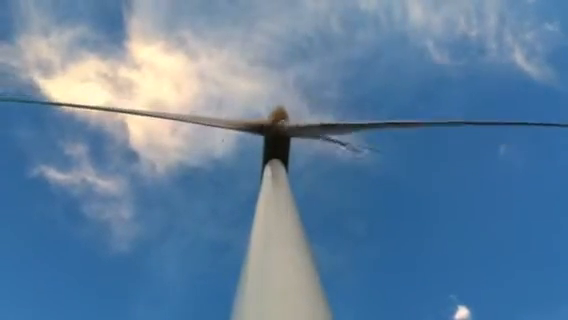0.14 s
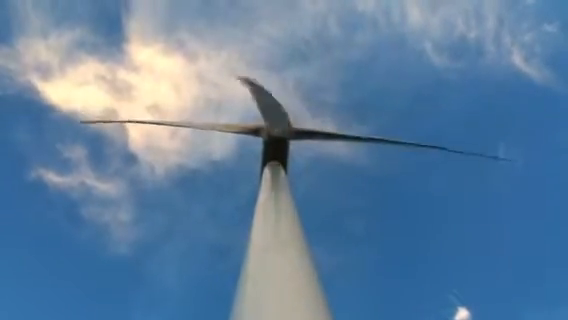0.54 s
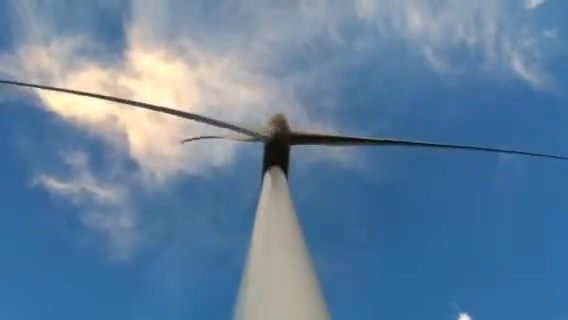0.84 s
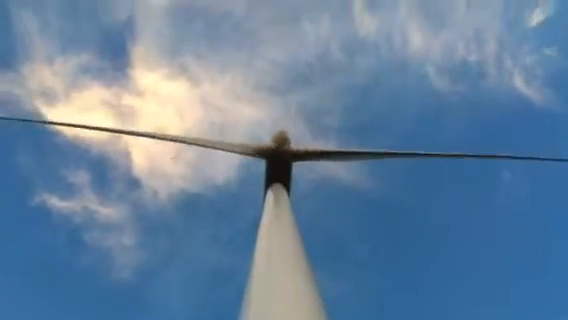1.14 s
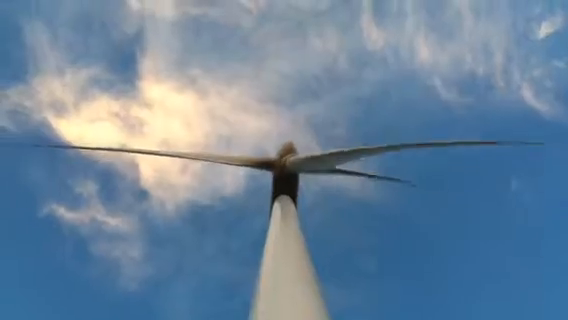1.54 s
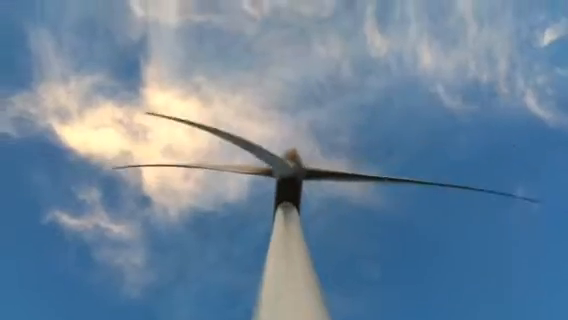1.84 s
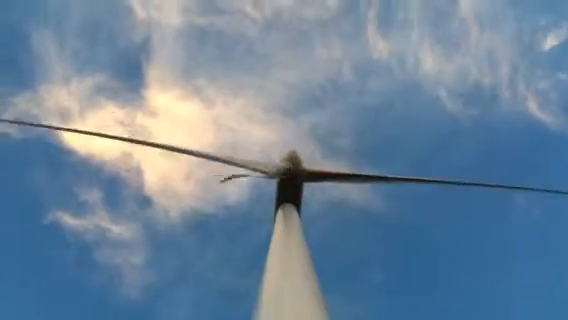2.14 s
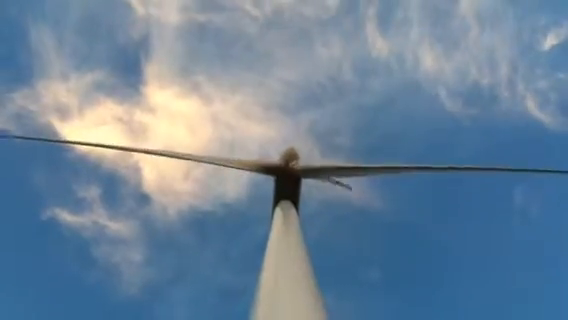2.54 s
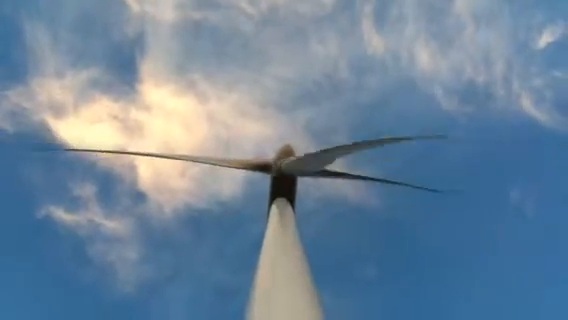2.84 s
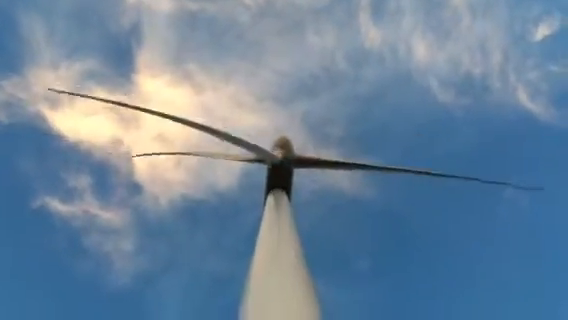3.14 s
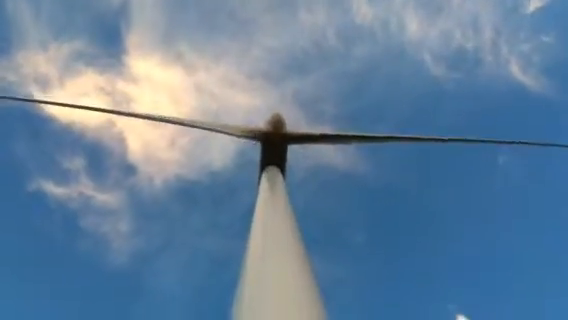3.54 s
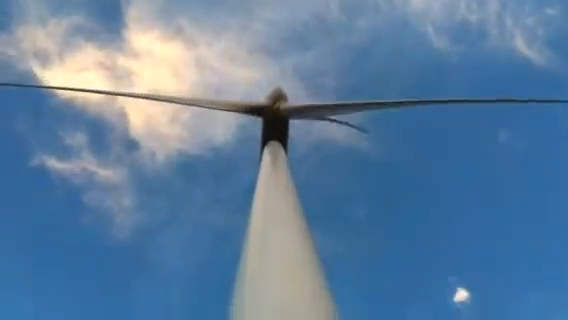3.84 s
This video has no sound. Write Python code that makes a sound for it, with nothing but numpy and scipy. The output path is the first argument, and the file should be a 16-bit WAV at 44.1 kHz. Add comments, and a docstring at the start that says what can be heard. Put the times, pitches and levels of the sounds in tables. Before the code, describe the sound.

Large turbine blades sweep by in regular breathy whooshes, each ending in fine hiss. Strong wind buffeting, irregular low thuds and snaps on an unprotected microphone grow from mid-clip, above a deep distant rush, outdoors.

```python
"""A wind turbine heard from the foot of its tower: each blade sweeps down with an airy swish that breaks
off as it passes, the finest hiss last, all shaped from random short-time spectra over a distant rush.
Gusty wind buffets the bare microphone: lumpy low noise makes the rumble, windowed noise bursts the short
snaps and thuds of eddies, and steady filtered noise lies deep underneath."""
import sys
import numpy as np
from scipy import signal
from scipy.fft import rfft, irfft, next_fast_len
from scipy.io import wavfile
from scipy.ndimage import uniform_filter1d

SR = 44100
rng = np.random.default_rng(int(sys.argv[2]) if len(sys.argv) > 2 else 0)


def invert_db(level):
    """Linear amplitude ratio for a level in decibels (20 dB per decade), elementwise."""
    return 10 ** (np.asarray(level, dtype=float) / 20)


def transcribe(u):
    """Save the signal u as a 16-bit wav file named by the first command-line argument.

    u: samples, shape (n,) or (channels, n), limited to [-1, 1]; the rate is SR.
    q: integer samples, one column per channel.
    """
    v = np.clip(np.atleast_2d(u).T, -1, 1)
    q = np.round(v * 32767).astype(np.int16)
    wavfile.write(sys.argv[1], SR, q)


N = 176400  # samples, 4 s


def read(points, hz):
    """Reads a spectrum in dB at hz, along a log frequency axis; -120 dB outside its points."""
    f, value = np.transpose(points)
    return np.interp(np.log(hz + 1), np.log(f + 1), value, left=-120, right=-120)


def evened(x):
    """Scales a signal to an rms of 1."""
    return x / np.sqrt(np.mean(x ** 2) + 1e-20)


def unit(points, hz):
    """Power per bin of a spectrum, summing to 1."""
    power = invert_db(2 * read(points, hz))
    return power / power.sum()


def step(t, width):
    """Smooth rise from 0 to 1 around t = 0."""
    return .5 + .5 * np.tanh(t / width)


def coloured(x, points):
    """Filters a signal to a spectrum given in dB."""
    size = next_fast_len(len(x))
    gain = invert_db(read(points, np.fft.rfftfreq(size, 1 / SR)))
    return irfft(rfft(x, size) * gain, size)[:len(x)]


def bell(t, rise_s, fall_s):
    """Bell-shaped power envelope around t = 0, with its own rise and fall."""
    return np.exp(-(t / np.where(t < 0, rise_s, fall_s)) ** 2)


def blades():
    """Turbulent air leaving the blade edges, as random short-time spectra whose power follows each pass."""
    # Blade passes. Each row: time of the pass in seconds, then the levels in dB of swish, hiss,
    # upper swish and body.
    passes = [(-.6, -56, -68, -80, -58), (.61, -52.5, -63, -78, -49.5), (1.84, -54.5, -64, -71.5, -51.5),
              (3.041, -57.5, -63, -63.5, -52.5), (4.26, -52.5, -64.5, -80, -49)]
    # Each blade is faintly heard earlier. Each row: seconds before its pass, swish level in dB.
    faint = [(.9, -64), (.9, -56.5), (0.88, -62.5), (0.82, -67.5), (0.93, -60.5)]
    # Tone of the airy swish. Each row: frequency in Hz, density in dB per Hz.
    swish = [(1060, -37), (1800, -13.5), (2310, -15.5), (3190, -0.5), (3600, -1), (4260, -4.5), (5220, -18),
             (9000, -33), (11700, -61), (19800, -120)]
    # Tone of the fine hiss. Each row: frequency in Hz, density in dB per Hz.
    hiss = [(2650, -36.5), (4500, 0.5), (5750, -10), (8250, -13), (13900, -18.5), (15200, -15)]
    # Tone of the duller body under the swish. Each row: frequency in Hz, density in dB per Hz.
    body = [(500, -13.5), (900, -1), (1500, 0.5), (2000, -4), (2600, -11), (3200, -25.5)]
    # Tone of the steady distant rush. Each row: frequency in Hz, density in dB per Hz.
    air = [(150, -25), (250, -10), (514, -16.5), (643, -19.5), (725, -12.5), (1440, -16.5), (2420, -25),
           (3240, -27.5), (5150, -36.5), (15200, -53.5)]
    air_db = -50.5
    # the swish comes clear, swells, breaks off, its treble later
    clear_s, clear_rise_s, swell_db_per_s = 0.471, .015, 3
    break_s, swish_lag_s_per_khz = .04, .055
    faint_rise_s = 0.045
    lull_db, lull_s = -1, 0.037  # a short lull comes just before the swish clears
    # finer hiss comes later and rises faster
    hiss_rise_s, hiss_fall_s, hiss_narrow_hz = .5, 0.14, 9000
    hiss_lag_s, hiss_lag_s_per_khz = -0.069, .012
    upper_hz, upper_width_hz, upper_swell_db_per_s = 6100, 780, 14.
    body_lead_s, body_rise_s, body_fall_s = 0.033, 0.38, 0.097
    # a dip from a nearby reflection jumps up just before a blade passes and slides back after
    rest_hz, jump_hz, back_s, dip_width_hz, dip_db = 2270, 870, 0.32, 330, -5.5

    hz = np.fft.rfftfreq(512, 1 / SR)[:, None]
    t = np.arange(N // 128 + 5) * 128 / SR
    power = unit(air, hz) * invert_db(2 * air_db) + 0 * t
    dip_hz = rest_hz + 0 * t
    lulls_db = 0 * t
    upper_band = 1 / (1 + ((hz - upper_hz) / upper_width_hz) ** 2) ** 2
    upper_band /= upper_band.sum()
    for (s, swish_db, hiss_db, upper_db, body_db), (early, faint_db) in zip(passes, faint):
        u = t - s
        clear = step(u + clear_s, clear_rise_s)
        before = np.minimum(u, 0)
        near = clear * invert_db(2 * (swish_db + swell_db_per_s * before))
        far = invert_db(2 * faint_db) * step(u + early, faint_rise_s)
        gone = step(swish_lag_s_per_khz * (hz / 1000 - 3.6) - u, break_s)
        power += unit(swish, hz) * (near + far) * gone

        hiss_t = u - hiss_lag_s - hiss_lag_s_per_khz * hz / 1000
        hiss_swell = bell(hiss_t, hiss_rise_s / (1 + hz / hiss_narrow_hz), hiss_fall_s)
        power += unit(hiss, hz) * invert_db(2 * hiss_db) * hiss_swell

        upper_level = invert_db(2 * (upper_db + upper_swell_db_per_s * before))
        power += upper_band * upper_level * clear * step(.04 - u, .02)

        body_swell = bell(u + body_lead_s, body_rise_s, body_fall_s)
        power += unit(body, hz) * invert_db(2 * body_db) * body_swell

        lulls_db += lull_db * np.exp(-((u + clear_s + lull_s) / lull_s) ** 2)
        dip_hz += jump_hz * step(u + 0.085, 0.024) * np.exp(-(np.maximum(u, 0) / back_s) ** 2)
    power *= invert_db(2 * lulls_db)
    power *= invert_db(2 * dip_db * np.exp(-((hz - dip_hz) / dip_width_hz) ** 2))

    real, imag, patches = rng.standard_normal((len(t), len(hz), 3)).T
    # uneven patches, 6 bins by 20 frames wide
    patches = uniform_filter1d(uniform_filter1d(patches, size=6, axis=0), size=20, axis=1)
    spectra = (real + 1j * imag) * np.sqrt(power) * invert_db(.7 * evened(patches))
    return signal.istft(spectra, nperseg=512, noverlap=384)[1][:N] / np.sqrt(3)  # overlap level


def deep_rush():
    """A steady deep rush, from the tower or the wind at large, as filtered noise."""
    # Tone of the rush. Each row: frequency in Hz, relative level in dB.
    deep = [(25, -20.5), (45, -3.5), (76, -5.5), (110, -7.5), (160, -47)]
    deep_db = -44
    return invert_db(deep_db) * evened(coloured(rng.standard_normal(N), deep))


def rumble():
    """Wind pressure on the microphone: low noise in random lumps, riding the gusts."""
    # Gust strength over time. Each row: time in seconds, rumble level in dB.
    gust = [(0.0, -39), (0.32, -50), (0.66, -39), (1.1, -38.5), (1.56, -34), (1.75, -31.5), (2.37, -38.5),
            (2.68, -36), (2.95, -35), (3.07, -39), (3.19, -41.5), (3.31, -30.5), (3.52, -38.5),
            (3.66, -44.5), (3.81, -55), (4.0, -47.5)]
    # Tone of the rumble. Each row: frequency in Hz, density in dB per Hz.
    rumble_tone = [(12, -44.5), (20, -11.5), (59, -2), (97, 2.5), (178, -4.5), (348, -24), (422, -23),
                   (700, -32), (910, -59), (1540, -120)]
    lump_db, lump_s = 4., 0.021
    bright_db_per_db = 0.1252  # gain above 170 Hz, per dB of level over -41.5 dB

    t = np.arange(N) / SR
    size = max(round(lump_s * SR), 2)
    lump = evened(uniform_filter1d(uniform_filter1d(rng.standard_normal(N), size), size))
    level_db = np.interp(t, *np.transpose(gust)) + lump_db * lump
    noise = evened(coloured(rng.standard_normal(N), rumble_tone))
    upper = signal.sosfilt(signal.butter(2, 170, "high", fs=SR, output="sos"), noise)
    # stronger moments are brighter
    brighter = invert_db(bright_db_per_db * (level_db + 41.5)) - 1
    return invert_db(level_db) * (noise + upper * brighter)


def eddies():
    """Eddies striking the microphone: each a ragged snap of noise inside a longer low thud."""
    # Each row: start in seconds, snap level and thud level in dB before their trims, snap length in
    # seconds before the 2 ms floor, snap brightness as a factor on its frequencies.
    strikes = [(0.042, -29, -60, 0.0057, 0.99), (0.309, -60, -35, 0.019, 1.4),
               (0.441, -18.5, -18.5, 0.015, 0.98), (0.527, -49, -37.5, 0.017, 1.3),
               (0.628, -43, -49, 0.02, 1.3), (0.694, -42.5, -28.5, 0.0054, 1.4),
               (0.798, -47, -31.5, 0.023, 1.3), (0.858, -35, -25.5, 0.018, 0.68),
               (0.935, -51, -22, 0.012, 2.2), (1.118, -33, -28, 0.016, 0.72),
               (1.149, -29, -31, 0.036, 0.61), (1.229, -25, -30, 0.023, 0.82),
               (1.249, -39, -39, 0.016, 0.97), (1.327, -43.5, -30.5, 0.015, 1.2),
               (1.381, -27, -29, 0.017, 0.82), (1.407, -32.5, -31, 0.015, 0.97),
               (1.433, -20, -16.5, 0.0086, 0.96), (1.469, -34, -24, 0.0048, 1.5),
               (1.486, -19, -16.5, 0.01, 1.23), (1.509, -26.5, -23, 0.0069, 0.96),
               (1.529, -28, -27, 0.014, 1.05), (1.55, -15.5, -16.5, 0.0093, 1),
               (1.568, -22.5, -25, 0.024, 1.05), (1.583, -21, -19, 0.0059, 1),
               (1.632, -15.5, -24.5, 0.015, 1.31), (1.665, -21, -22, 0.0073, 0.99),
               (1.728, -29, -40, 0.013, 0.82), (1.76, -20, -29.5, 0.009, 1.14),
               (1.83, -13, -22, 0.0049, 1.23), (1.836, -20.5, -30, 0.0075, 1.2),
               (1.881, -25, -29, 0.0094, 0.89), (1.912, -26, -30.5, 0.0084, 1.22),
               (1.929, -21.5, -25.5, 0.0095, 0.78), (2.028, -28.5, -34, 0.012, 0.71),
               (2.081, -26.5, -30.5, 0.011, 1.08), (2.174, -52, -31, 0.0052, 1.05),
               (2.244, -30.5, -27.5, 0.028, 0.96), (2.305, -18.5, -24, 0.012, 0.89),
               (2.375, -38.5, -22.5, 0.0096, 0.88), (2.451, -32.5, -34, 0.012, 0.64),
               (2.541, -19, -21.5, 0.0084, 0.69), (2.607, -31, -24.5, 0.014, 0.51),
               (2.648, -19, -21.5, 0.01, 0.83), (2.712, -16.5, -17.5, 0.015, 1.06),
               (2.746, -27.5, -33, 0.019, 1.22), (2.797, -17.5, -25.5, 0.011, 0.94),
               (2.823, -22.5, -36, 0.0085, 0.94), (2.854, -38, -25.5, 0.018, 1.37),
               (2.975, -21.5, -33, 0.0066, 0.81), (2.996, -20.5, -21.5, 0.02, 0.77),
               (3.017, -19.5, -30, 0.0073, 1.12), (3.035, -11.5, -21, 0.0094, 1.064),
               (3.106, -16.5, -20, 0.008, 0.89), (3.14, -27, -22, 0.018, 0.98),
               (3.161, -21, -37, 0.014, 1.29), (3.195, -17, -26.5, 0.008, 1.06),
               (3.293, -34, -37, 0.031, 1), (3.339, -23, -31.5, 0.01, 1.08),
               (3.373, -31, -43, 0.0084, 1.14), (3.452, -27, -18.5, 0.02, 1.27),
               (3.465, -20, -24.5, 0.013, 1.04), (3.479, -13.5, -16.5, 0.0079, 0.61),
               (3.494, -18, -50, 0.011, 0.99), (3.578, -33, -29, 0.018, 0.89),
               (3.599, -38.5, -34.5, 0.009, 1.2), (3.723, -49, -27, 0.021, 1.3),
               (3.746, -28.5, -25.5, 0.024, 0.96), (3.768, -30, -28.5, 0.0061, 0.9),
               (3.8, -36.5, -29, 0.012, 1.4), (3.82, -22, -21.5, 0.0098, 1.14)]
    # Tone of the snap at brightness 1. Each row: frequency in Hz, relative level in dB.
    snap_tone = [(150, -9.5), (250, -1.5), (450, -3), (650, -17), (900, -31), (1300, -40), (2000, -66)]
    # Tone of the thud. Each row: frequency in Hz, relative level in dB.
    thud_tone = [(25, -29), (50, -5.5), (80, -2.5), (130, -1.5), (200, -5), (300, -31), (500, -64)]
    snap_trim_db, thud_trim_db, thud_longer, rise_s = -6, -2.5, 1.65, 0.0053
    skirt, skirt_s = 0.064, 0.037  # weaker flutter around each eddy
    kick, kick_s = 1.9, .004  # one sharp jolt just after the start of each snap
    lead_s = .04  # room for the flutter ahead of the start

    out = np.zeros(N + 8192)
    t = np.arange(8192) / SR - lead_s
    for s, snap_db, thud_db, length, bright in strikes:
        snap_noise, thud_noise = rng.standard_normal((2, len(t)))
        # the jolt falls in a random direction, 8 samples to either side
        snap_noise += kick * np.sign(snap_noise[0]) * np.exp(-((t - kick_s) * SR / 8) ** 2)
        snap = [(hz * bright, db) for hz, db in snap_tone]
        layers = ((snap_noise, snap, snap_db + snap_trim_db, length),
                  (thud_noise, thud_tone, thud_db + thud_trim_db, length * thud_longer))
        for noise, tone, db, long in layers:
            window = step(t, rise_s) * np.exp(-(np.maximum(t, 0) / max(long, .002)) ** 2)
            window += skirt * np.exp(-((t - long / 2) / skirt_s) ** 2)
            burst = coloured(noise * window, tone)
            # the burst takes the energy of its window
            burst *= invert_db(db) * np.sqrt((window ** 2).sum() / (burst ** 2).sum())
            at = round((s - lead_s) * SR)
            out[max(at, 0):at + len(t)] += burst[max(-at, 0):]
    return out[:N]


def scene():
    """Blades, deep rush, rumble and eddies summed to one channel."""
    return (blades() + deep_rush() + rumble() + eddies())[None]


def low_pass(x):
    """Removes everything above the highest recorded frequency."""
    return signal.sosfilt(signal.butter(12, 15340, fs=SR, output="sos"), x)


def record(dry):
    """The recorder's bass cut, own hiss and band limit."""
    bass_cut_hz, self_noise_db, edge_hz = 51.5, -83.5, 15300
    mix = signal.sosfilt(signal.butter(2, bass_cut_hz, "high", fs=SR, output="sos"), dry)
    mix = mix + invert_db(self_noise_db) * rng.standard_normal(dry.shape)
    lowpass = signal.firwin(1023, edge_hz, window=("kaiser", 9), fs=SR)
    mix = signal.oaconvolve(mix, lowpass[None], "same")
    return low_pass(mix)


dry = scene()
out = record(dry)
transcribe(out)
```